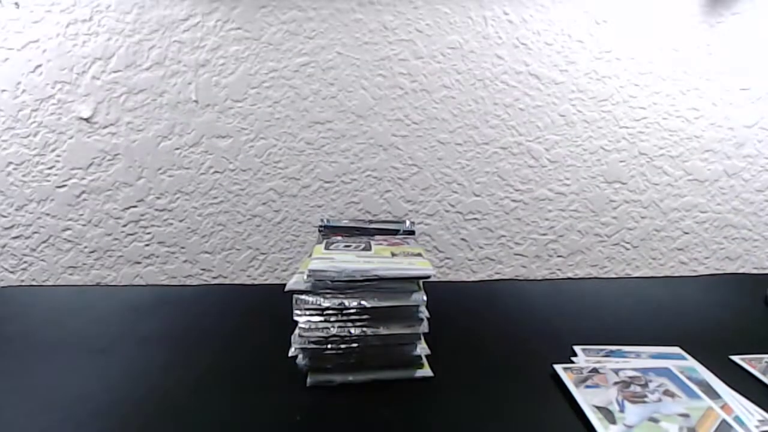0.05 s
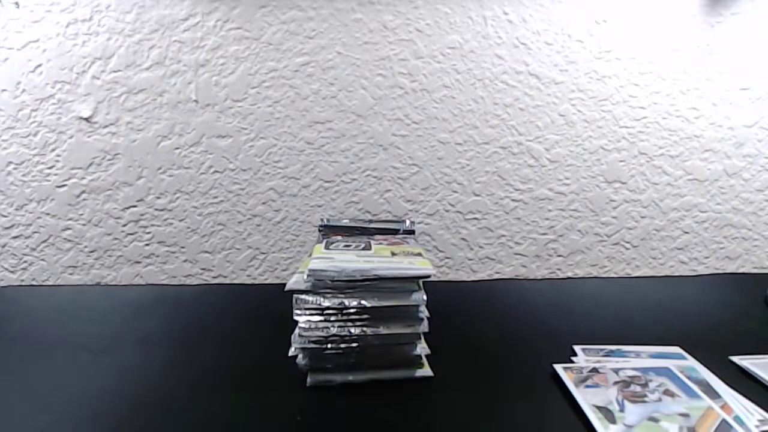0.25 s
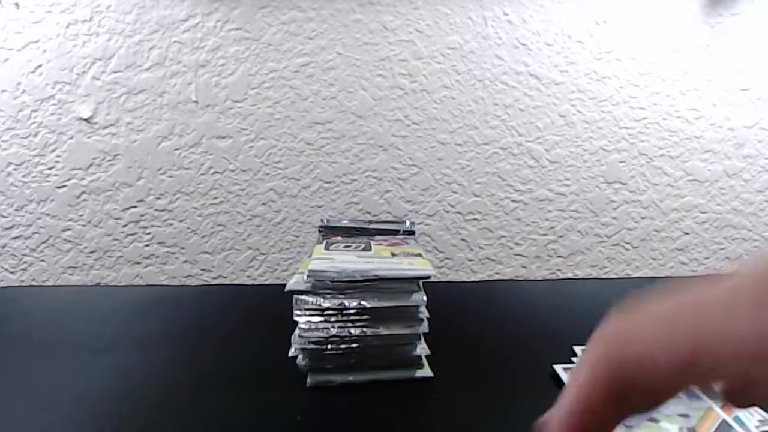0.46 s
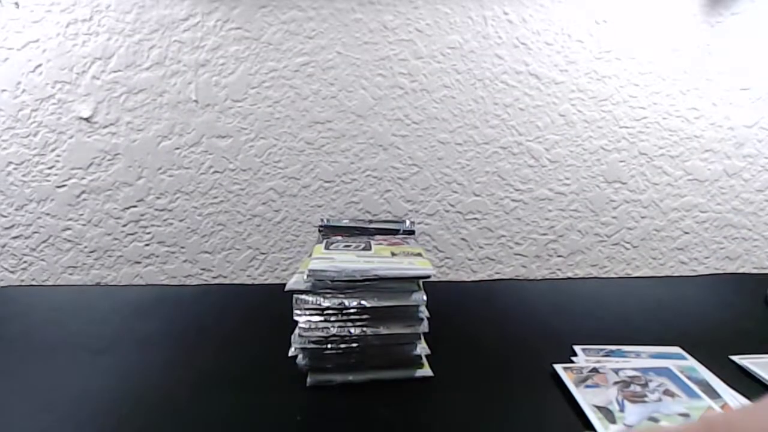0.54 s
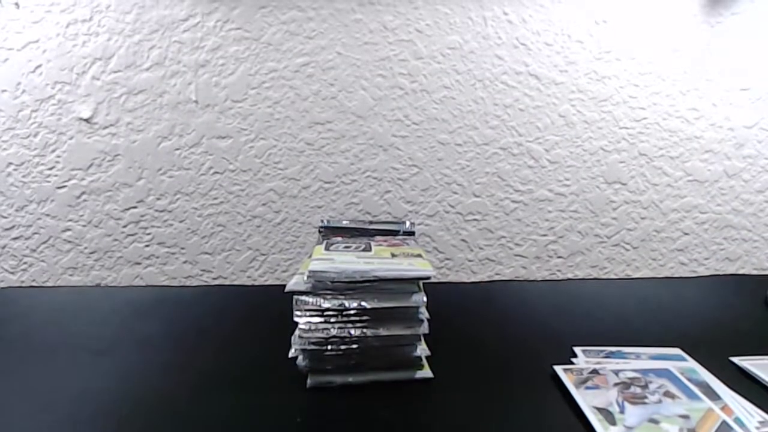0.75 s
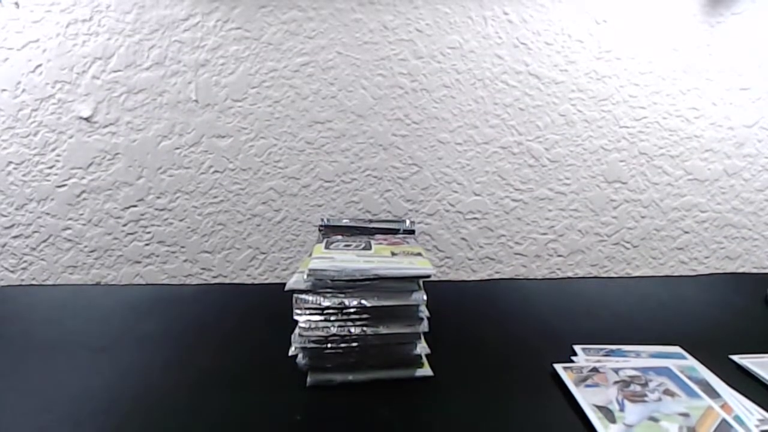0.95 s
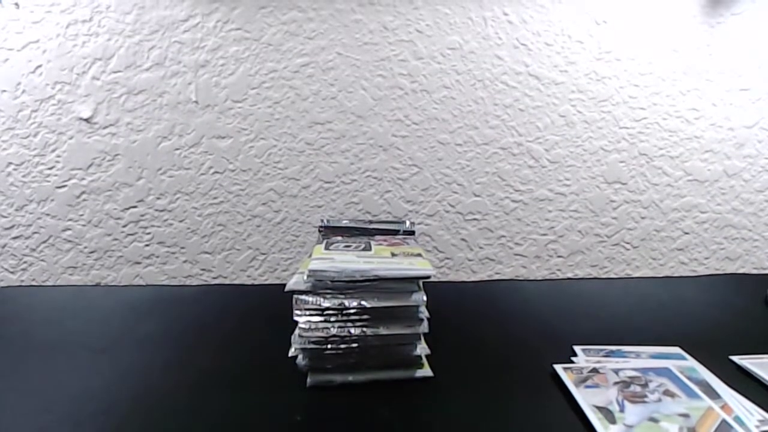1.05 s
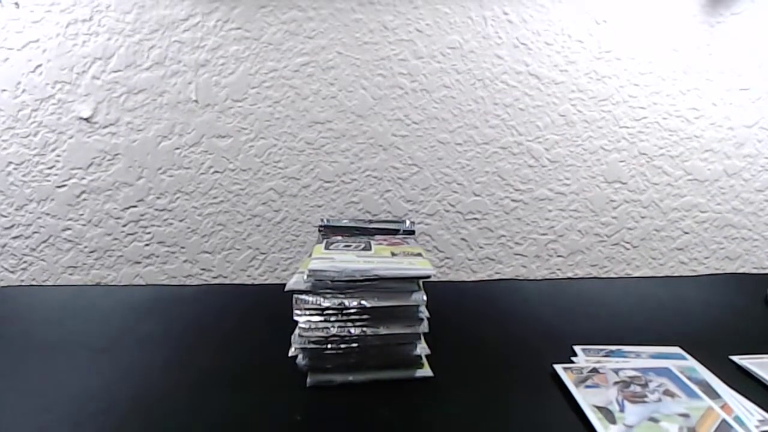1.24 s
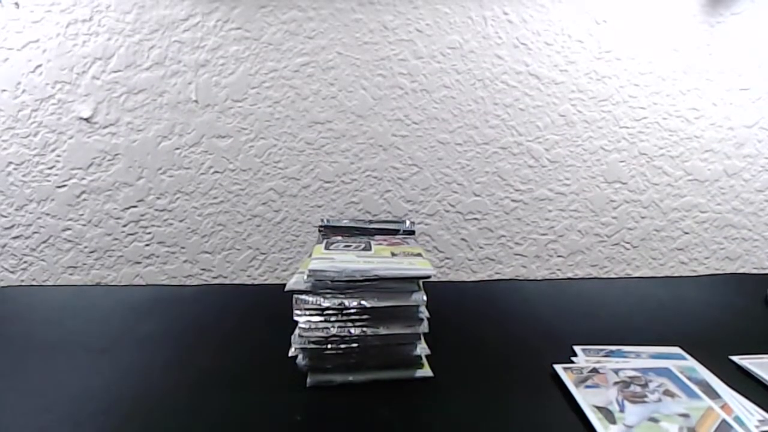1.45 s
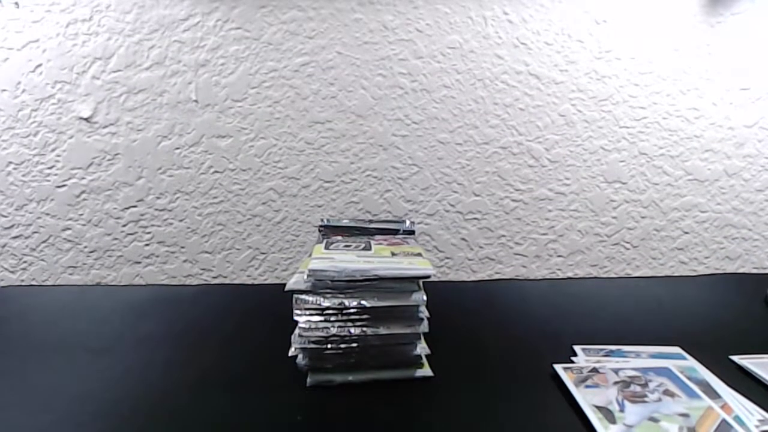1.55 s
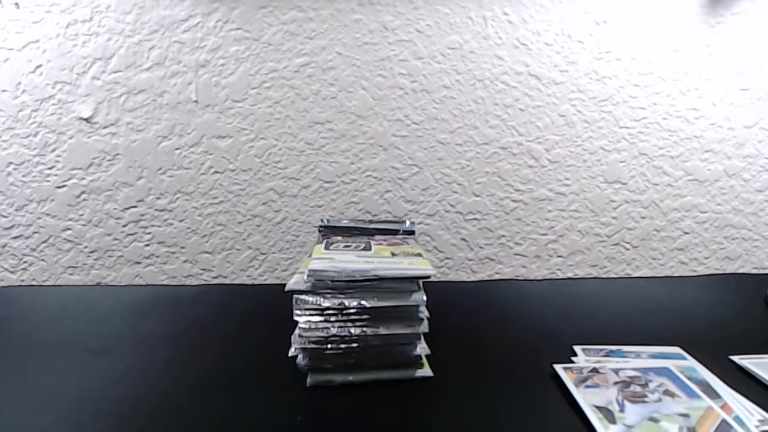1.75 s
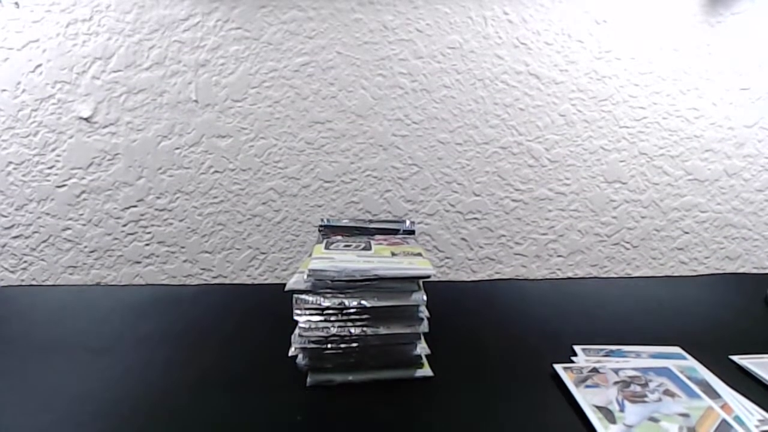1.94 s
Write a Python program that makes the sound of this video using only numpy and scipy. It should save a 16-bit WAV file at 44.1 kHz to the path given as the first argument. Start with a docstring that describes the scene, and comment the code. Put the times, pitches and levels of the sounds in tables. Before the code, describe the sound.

A stiff card snaps sharply onto a wooden table at 0.2 seconds, slightly to the right, with a finger knock and a low thud. Faint card slides and ticks follow from 0.5 seconds, with a tiny squeal near 1 second. Softer knocks thump the tabletop around 1.2 seconds and again from 1.5 to 1.7, with light rustling. A low hum lies underneath in the small room.

```python
"""Trading cards on a table

In a small room a stiff card snaps down, card edges tick, and cards slide with a rustle and a faint squeal.
Fingers knock on the wood and set the table top booming; shoves make the whole table sway.
The walls add a short tail. Behind it all are a dull, fading rustle, soft noise and a low hum."""
import sys
import numpy as np
from scipy import signal
from scipy.fft import rfft, irfft
from scipy.io import wavfile
from scipy.ndimage import uniform_filter1d

SR = 44100
rng = np.random.default_rng(int(sys.argv[2]) if len(sys.argv) > 2 else 0)


def dump(signal):
    """Clip the signal to [-1, 1] and save it as 16-bit WAV at the path in sys.argv[1]."""
    limited = np.clip(np.atleast_2d(signal).T, -1, 1)
    pcm = np.round(limited * 32767).astype(np.int16)
    wavfile.write(sys.argv[1], SR, pcm)


N = 88200
CARD_PAN_DB, CARD_ROOM_DB = -5, 0.5

# tone of the slap as it comes straight from the card: f/Hz, level/dB
SLAP_TONE = [(300, -6.5), (600, -17.5), (1000, -2), (1500, 8.5), (2250, -17.5), (2950, 6), (3550, -21),
             (4100, 0.5), (5500, -3), (7000, -2), (8400, 2), (9500, -13), (13000, -23), (16000, -15.5)]
# tone of the slap as the walls return it: f/Hz, level/dB
SLAP_ECHO_TONE = [(300, -8), (600, -13), (1000, -2), (1500, -2.5), (2250, 0.5), (2900, 8), (3550, -2),
                  (4100, 3), (5500, 2), (7000, 0), (8400, -0.5), (9500, -9), (13000, -15), (16000, -39)]
def card_snap(start=0.2047, db=5.5, fade_s=0.0077):
    """A stiff card slaps flat and the walls answer."""
    crack = colour(burst(start, db, fade_s, rattle=2), SLAP_TONE)
    echo = colour(burst(start, db, fade_s, rattle=0), SLAP_ECHO_TONE)
    return crack * pan(CARD_PAN_DB) + room(echo, wet_db=-1.5)


# light touches of card on card: t/s, level/dB
EDGE_TOUCHES = [(0.197, -19), (0.2215, -9), (0.546, -36), (0.774, -30.5), (0.885, -21.5), (1.167, -23.5),
                (1.169, -36), (1.177, -20.5), (1.603, -35), (1.756, -26.5), (1.785, -30.5)]
# tone of a tick: f/Hz, level/dB
TICK_TONE = [(300, -4), (1200, -3), (3000, 5), (7500, -4), (10000, -9), (13000, -11), (16000, -5)]
def card_ticks():
    """Card edges tick against each other."""
    clicks = sum(burst(start, db, fade_s=0.05, rattle=6) for start, db in EDGE_TOUCHES)
    ticks = colour(clicks, TICK_TONE)
    return ticks * pan(CARD_PAN_DB) + room(ticks, CARD_ROOM_DB)


# finger knocks: t/s, boom level/dB, boom tilt/(dB per octave), clack level/dB, clack fade/s, cutoff/Hz
FINGER_KNOCKS = [(0.1974, -45, -11, -7, 0.0055, 3030), (0.208, -30, 9, -1, 0.018, 2500),
                 (0.243, -15, -7.5, 3.5, 0.014, 1760), (0.532, -27.5, -9, -18, 0.066, 895),
                 (0.572, -34, 0, -44, 0.033, 600), (0.695, -42.5, 5, -21, 0.13, 900),
                 (0.917, -50, -5, -17.5, 0.091, 1640), (1.16, -25.5, 3.5, -7, .03, 705),
                 (1.1644, -26.5, -6, -7, 0.035, 2460), (1.182, -25, 4.5, -9, 0.053, 1510),
                 (1.294, -34, 4, -16, 0.08, 700), (1.528, -26.5, 3, -15.5, 0.12, 890),
                 (1.655, -22.5, -2.5, -34, .03, 500), (1.665, -21, -20, -17.5, 0.22, 650)]
# tone of a finger hitting wood: f/Hz, level/dB
WOOD_TONE = [(120, -4.5), (250, 6.5), (450, -0.5), (680, 1), (830, -5.5), (1050, 1), (1500, -6.5),
             (2200, -11.5), (4000, -19.5), (9000, -21.5), (16000, -37.5)]
def finger_knocks():
    """Each knock gives a woody clack and a boom; a softer touch makes a duller clack."""
    clacks = booms = 0
    for start, boom_db, tilt_db, clack_db, fade_s, cutoff_hz in FINGER_KNOCKS:
        soften = signal.butter(2, cutoff_hz, fs=SR, output="sos")
        clacks += signal.sosfilt(soften, burst(start, clack_db, fade_s, rattle=1.67))
        booms += table_boom(start, boom_db, tilt_db)
    clacks = colour(clacks, WOOD_TONE)
    return booms + clacks * pan(-7.5) + room(clacks, wet_db=-3)


# notes the table top rings at: f/Hz, level/dB, fade/s, left minus right/dB
TABLE_NOTES = [(77, -0.5, 0.2, -2), (99, -0.5, 0.3, 17.5), (109.4, -12, 0.47, 5), (143.6, -12, 0.34, -9),
               (193.07, -4.5, 0.34, 15.5), (207.2, -17, 0.13, 15), (238.8, -12.5, 0.15, 5.5),
               (275.8, -14, 0.15, -0.5), (347, -20.5, 0.18, -2.5), (483.5, -15.5, 0.079, -9),
               (609, -26.5, 0.18, -11), (725, -33, 0.29, -3)]
def table_boom(start, db, tilt_db, rise_s=0.015, right_lag_s=0.00091):
    """One knock swells into the table top's own notes, the higher ones sooner."""
    boom = np.zeros((2, N))
    main_hz = TABLE_NOTES[1][0]
    span = slice(int(start * SR), int(start * SR) + SR // 2)
    t = np.array([since(start)[span], since(start + right_lag_s)[span]])
    for hz, note_db, fade_s, side_db in TABLE_NOTES:
        swell = 1 - np.exp(-(t / rise_s) ** 2 * hz / main_hz)
        ring = np.sin(2 * np.pi * hz * t) * fade(t, fade_s) * swell
        boom[:, span] += ring * gain(db + note_db + tilt_db * np.log2(hz / main_hz)) * pan(side_db)
    return boom


# shoves against the table: t/s, level/dB
TABLE_SHOVES = [(0.266, -19.5), (1.192, -24.5), (1.568, -25)]
def table_sway(hz=19.3, fade_s=1.9):
    """Each shove rocks the whole table with a very deep wobble."""
    sway = 0
    for start, db in TABLE_SHOVES:
        t = since(start)
        swell = 1 - np.exp(-t * hz)
        sway += gain(db) * np.sin(2 * np.pi * hz * t) * fade(t, fade_s) * swell
    return sway


# tones of a sliding card (flat drag, ringing scrape, light brush): f/Hz, level/dB
DRAG_TONE = [(200, 23.5), (450, 4), (800, 8), (1500, -0.5), (2700, -3), (5000, -5), (7500, -4.5),
             (10000, -10.5), (12500, -8), (14500, -5), (16000, -15)]
SCRAPE_TONE = [(300, -5.5), (700, -9), (1300, -5), (1900, -6), (2350, 6), (2700, 3), (3150, -5.5),
               (3500, -4), (4500, -9), (7300, -12), (9500, -25), (13000, -19.5), (16000, -27)]
BRUSH_TONE = [(400, 7), (1200, 1.5), (2000, -17), (3100, 6.5), (4500, 0), (7200, 7.5), (10000, -1),
              (16000, -12)]
# slides: t/s, length/s, first level/dB, last level/dB, release/s, tone name
CARD_SLIDES = [(0.534, 0.13, -54.5, -49.5, 0.13, "drag"), (0.78, 0.12, -54.5, -42.5, 0.0049, "scrape"),
               (0.876, 0.037, -65, -50.5, 0.0045, "brush"), (1.151, 0.014, -62, -40, 0.031, "drag"),
               (1.227, 0.011, -62, -56, .015, "brush"), (1.522, 0.23, -57, -55.5, 0.029, "drag"),
               (1.762, 0.025, -48.5, -53.5, 0.021, "brush")]
def card_slides(clicks_per_s=9000, rise_s=0.013, flutter_db=-1.65):
    """Card fibres catch and slip in many tiny clicks that blur into a rustle; one squeal joins in."""
    tones = {"drag": DRAG_TONE, "scrape": SCRAPE_TONE, "brush": BRUSH_TONE}
    rustle = 0
    for start, length, first_db, last_db, release, tone in CARD_SLIDES:
        slips = rng.random(N) < clicks_per_s / SR
        clicks = slips * rng.standard_normal(N) * gain(0.5 * rng.exponential(size=N))
        t = since(start)
        effort = gain(np.interp(t, [0, length], [first_db, last_db]) + flutter_db * wander(70))
        shape = (1 - np.exp(-t / rise_s)) * np.exp(-since(start + length) / release)
        rustle += colour(clicks / clicks.std() * effort * shape, tones[tone])
    sliding = rustle + edge_squeal()
    return sliding * pan(CARD_PAN_DB) + room(sliding, CARD_ROOM_DB)


# pitches of the squeal: starting f/Hz, level/dB
SQUEAL_NOTES = [(6400, -74.5), (13450, -76.5)]
def edge_squeal(start=0.92, length_s=0.155, fall=0.2, flicker_db=4):
    """A card edge squeals faintly, dropping in pitch as it slows."""
    progress = np.minimum(since(start) / length_s, 1)
    speed = 1 - fall * progress ** 2 + 0.0083 * wander(1300)
    shape = np.sqrt(abs(np.sin(np.pi * progress)))
    return shape * sum(gain(db + flicker_db * wander(79.8)) * sine(hz * speed) for hz, db in SQUEAL_NOTES)


# how long the room rings at each pitch: f/Hz, fade/s
ROOM_FADES = [(150, 0.24), (600, 0.23), (1500, 0.29), (4000, 0.29), (8000, 0.26), (15000, 0.25)]
def room(sound, wet_db, rise_s=0.0011):
    """The walls return a short wash of echoes, different in each ear."""
    hz, t, frames = signal.stft(rng.standard_normal((2, N // 2)), SR, nperseg=256)
    shape = fade(t, curve(ROOM_FADES, hz)[:, None]) * (1 - np.exp(-t / rise_s))
    tail = signal.istft(frames * shape, SR)[1]
    return gain(wet_db) * convolve(sound, tail / np.sqrt(np.sum(tail ** 2) / 2))


# tone of the opening rustle: f/Hz, level/dB
RUSTLE_TONE = [(200, 0.5), (700, 2.5), (1600, -2.5), (4000, -13.5), (16000, -40)]
def dull_rustle(db=-56.5, fade_s=0.43):
    """A dull rustle dies away at the start."""
    return colour(rng.standard_normal((2, N)) * fade(since(0), fade_s), RUSTLE_TONE) * gain(db)


# tone of the room noise: f/Hz, level/dB
AIR_TONE = [(25, 5), (45, -4), (70, 1), (130, -9), (260, -10), (500, -22), (1000, -26), (2000, -27.5),
            (4000, -33), (8000, -38), (16000, -40.5)]
# pitches of the hum: f/Hz, level/dB
HUM_NOTES = [(19.5, -44), (100, -56.5), (198, -69), (266, -69.5)]
def background(air_db=-54.5):
    """Soft room noise, partly shared by both ears, and a wavering low hum to the left."""
    air = colour(rng.standard_normal((2, N)) * 0.81 + rng.standard_normal(N) * 0.59, AIR_TONE)
    hum = sum(gain(db + 2 * wander(3.8)) * sine(hz * (1 + 0.0128 * wander(4))) for hz, db in HUM_NOTES)
    return air * gain(air_db) + hum * pan(9)


def burst(start, db, fade_s, rattle, spread=0.64):
    """A contact: one click and a dying rattle, a little different in each ear."""
    t = since(start)
    noise = rng.standard_normal(N) + spread * rng.standard_normal(N) * np.array([[1], [-1]])
    tail = (t > 0) * noise * fade(t, fade_s)
    contact = rattle * tail / np.linalg.norm(tail[0])
    contact[:, int(start * SR)] += 1
    return gain(db) * contact / np.sqrt(1 + rattle ** 2)


def colour(sound, tone, size=4096):
    """Gives a sound a tone; the table's levels only set the balance of low and high."""
    hz = np.fft.rfftfreq(size, 1 / SR)
    bass_cut = np.clip((hz + 1) / tone[0][0], 0, 1) ** 2
    gains = gain(curve(tone, hz)) * bass_cut
    cepstrum = irfft(np.log(gains / np.sqrt(np.mean(gains ** 2))))
    # fold the filter so that it rings only after a hit, never before
    cepstrum[1:size // 2] *= 2
    cepstrum[size // 2 + 1:] = 0
    return convolve(sound, irfft(np.exp(rfft(cepstrum))))


def convolve(sound, response):
    return signal.fftconvolve(np.atleast_2d(sound), np.atleast_2d(response), axes=-1)[:, :N]


def curve(points, hz):
    """Reads between a table's rows, with octaves evenly spaced."""
    pitches, values = np.array(points, float).T
    return np.interp(np.log(hz + 1), np.log(pitches), values)


def gain(db):
    return 10 ** (np.asarray(db) / 20)


def pan(db):
    """Left and right gains; positive is louder on the left."""
    return gain(np.array([[db], [-db]]) / 2)


def since(start):
    """Seconds since a moment, zero before it."""
    return np.maximum(np.arange(N) / SR - start, 0)


def fade(t, fade_s):
    """Dies away by 60 dB in fade_s seconds."""
    return np.exp(-np.log(1000) * t / fade_s)


def sine(hz):
    """A pure note that follows a changing pitch."""
    return np.sin(2 * np.pi * np.cumsum(hz) / SR)


def wander(turns_per_s):
    """A smooth random drift, roughly 1 in size."""
    step = int(SR / turns_per_s)
    return uniform_filter1d(np.repeat(rng.standard_normal(N // step + 1), step), step)[:N]


def scene():
    """Cards, table and room together."""
    return (card_snap() + card_ticks() + finger_knocks() + table_sway() + card_slides()
            + dull_rustle() + background())


def record(dry):
    """Cuts the very highest treble, above 15750 Hz."""
    return signal.sosfilt(signal.ellip(10, 0.1, 80, 15750, fs=SR, output="sos"), dry)


dry = scene()
out = record(dry)
dump(out)
```